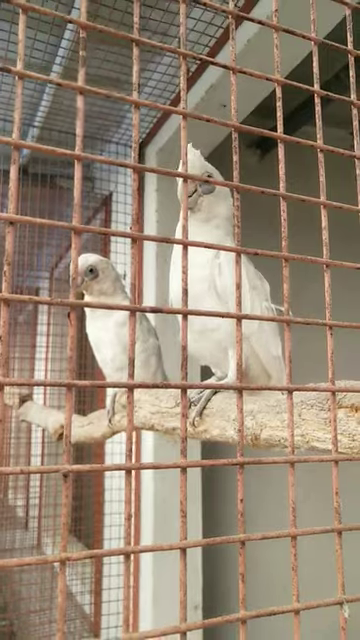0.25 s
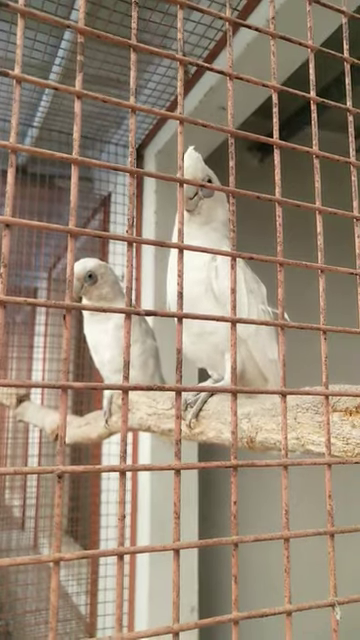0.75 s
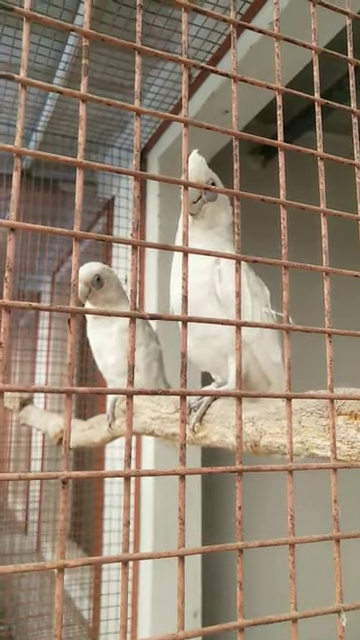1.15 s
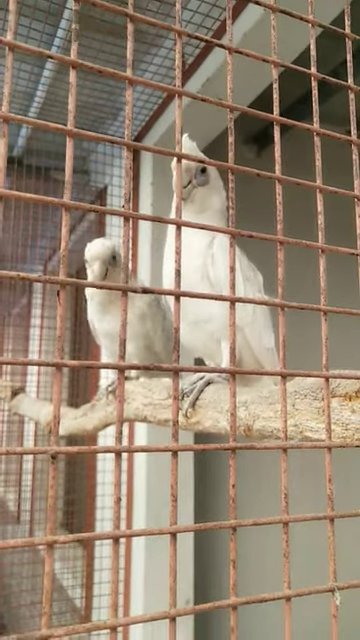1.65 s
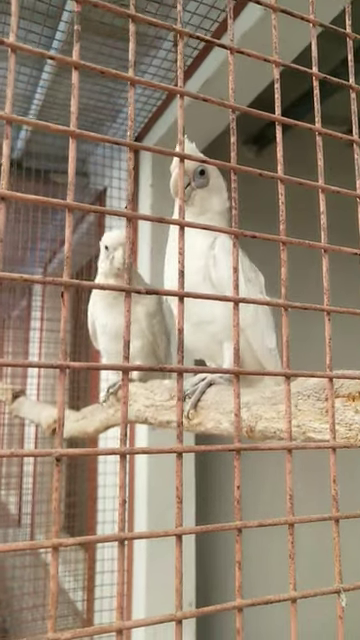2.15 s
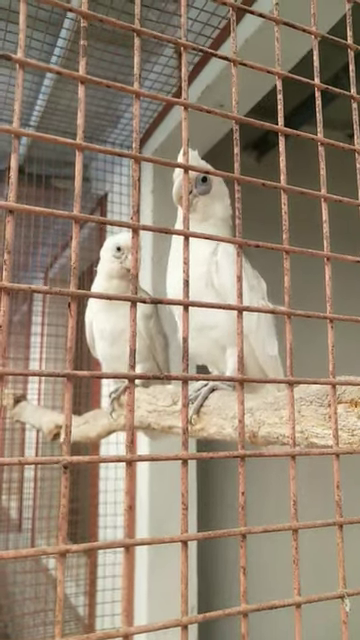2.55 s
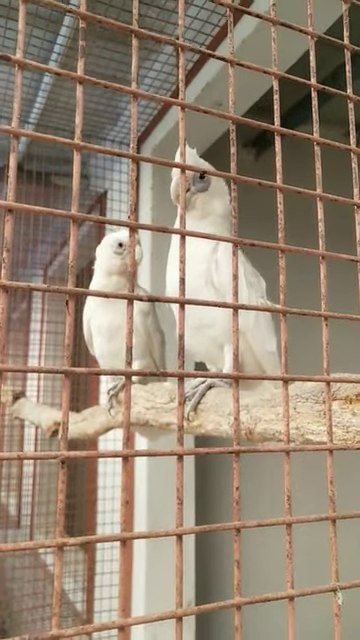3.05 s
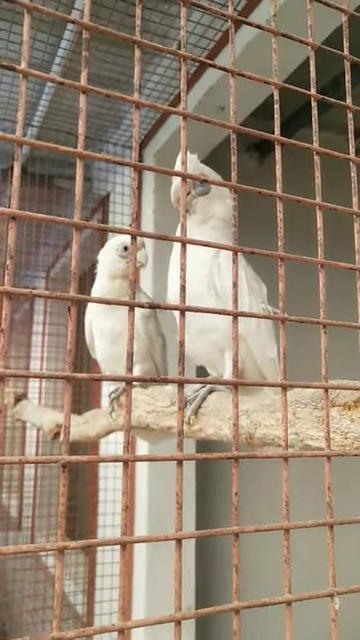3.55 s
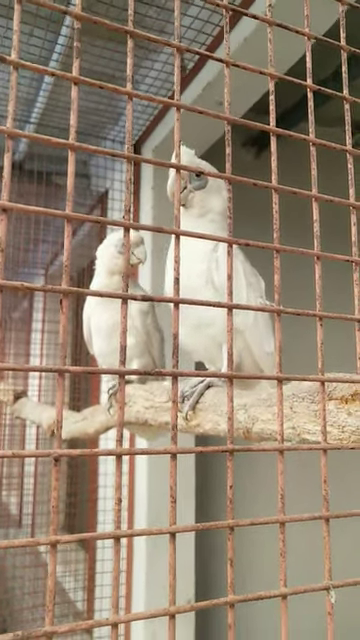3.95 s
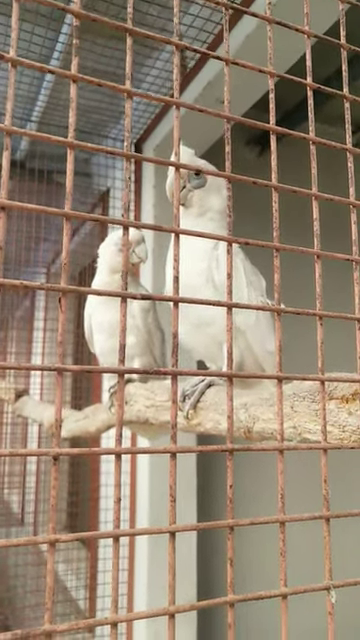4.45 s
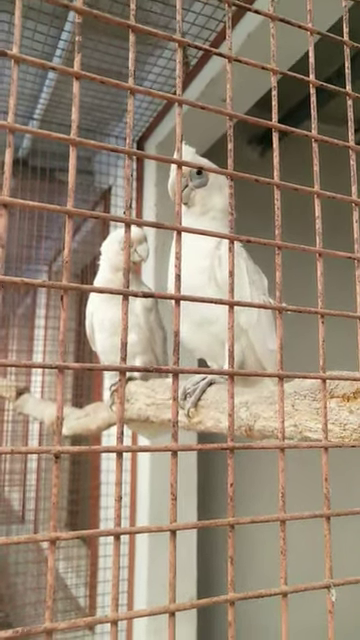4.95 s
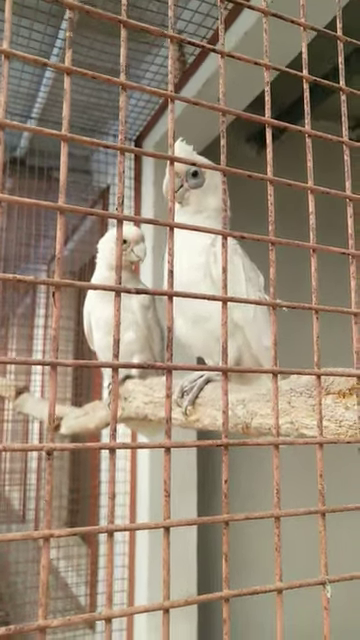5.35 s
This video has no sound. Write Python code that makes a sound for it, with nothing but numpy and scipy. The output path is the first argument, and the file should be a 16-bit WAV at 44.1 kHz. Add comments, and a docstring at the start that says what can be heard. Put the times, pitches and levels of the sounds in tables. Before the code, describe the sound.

In an echoing aviary, a cockatoo gives a string of short, nasal, trembling cries, about two or three a second, strongest near two seconds. Birds in other cages answer with rising squeals; later come low yelps, one hollow reply, then a clear level whistle between loud squeals. Far bangs and a shimmering distant flock lie behind. A small stereo microphone hears mostly reflections.

```python
"""An echoing aviary: a cockatoo begs with nasal, quavering cries and its partner replies once.
Birds in other cages answer with rising squeals, a clear whistle and low yelps, among thin high notes.
Each voice is a gliding stack of overtones, shaken in pitch and level, with rasping air on top.
Noise that dies away gives the echoes and far bangs; wavering tones blur into a far flock over a low
noise of open air. A small stereo microphone hears it all."""
import sys
import numpy as np
from scipy import signal
from scipy.fft import rfft, irfft, next_fast_len
from scipy.io import wavfile

SR = 44100
rng = np.random.default_rng(int(sys.argv[2]) if len(sys.argv) > 2 else 0)


def log_audio(samples):
    """Write samples as a 16-bit WAV file to the path given in sys.argv[1]."""
    # one column per channel
    frames = np.atleast_2d(samples).T
    # limit to full scale, then quantise
    limited = np.clip(frames, -1, 1)
    pcm = np.round(limited * 32767).astype(np.int16)
    wavfile.write(sys.argv[1], SR, pcm)


N = 246519
TIME = np.arange(N) / SR
PORT_GAP_M = 0.16  # between the two microphone ports


def from_db(db):
    """Decibels to gain."""
    return 10 ** (np.asarray(db) / 20)


def rms_one(x):
    """Scale to an rms of 1."""
    return x / np.sqrt(np.mean(x ** 2) + 1e-20)


def at_hz(points, hz):
    """Read a table on a log-frequency axis."""
    known_hz, values = np.transpose(points)
    return np.interp(np.log(np.maximum(hz, 1)), np.log(known_hz), values)


def bins(x):
    """Frequencies of the spectrum of x."""
    return np.fft.rfftfreq(x.shape[-1], 1 / SR)


def coloured(x, spectrum):
    """Give noise a spectrum; rms 1."""
    shaped = rfft(x) * from_db(at_hz(spectrum, bins(x)))
    return rms_one(irfft(shaped, x.shape[-1]))


def drift(rate_hz, size):
    """Smooth random wandering, spread 1: noise through two equal one-pole lowpasses."""
    r = np.exp(-2 * np.pi * rate_hz / SR)
    noise = rng.standard_normal(size + SR // 10)  # the extra tenth of a second settles the filter
    return rms_one(signal.lfilter([1], [1, -2 * r, r * r], noise)[-size:])


def tone_phase(hz):
    """Running phase of a tone whose pitch moves."""
    return 2 * np.pi * np.cumsum(hz) / SR


def diffuse(size):
    """Noise from all directions at two ports: alike in the bass, unrelated in the treble."""
    white = rng.standard_normal((2, next_fast_len(size)))
    mid, side = rfft(white)
    speed_of_sound = 343  # m/s
    alike = .94 * np.sinc(2 * bins(white) * PORT_GAP_M / speed_of_sound)
    mid, side = np.sqrt(1 + alike) * mid, np.sqrt(1 - alike) * side
    return rms_one(irfft([mid + side, mid - side], white.shape[-1])[:, :size])


# How long the building rings. Each row: frequency in Hz, time to fall by 60 dB in seconds.
REVERB = [(100, 3.8), (300, 2.6), (1000, 1.1), (2500, 1.56), (4500, 0.14), (8000, 1.29), (15000, 0.31)]


def dying_field(size):
    """Diffuse noise in which each octave dies at the pace of the building."""
    noise, t = diffuse(size), np.arange(size) / SR
    spectrum, centres, out = rfft(noise), np.geomspace(100, 12800, 8), 0
    for hz, share in zip(centres, np.eye(len(centres))):
        # each band peaks at its centre and crossfades into its neighbours
        band = irfft(spectrum * at_hz(np.c_[centres, share], bins(noise)), size)
        out = out + band * from_db(-60 * t / at_hz(REVERB, hz))
    return out


def aviary(x, direct_db, early_db, early_s, lag_ms=0):
    """Direct sound, a flurry of echoes from the nearest walls, and the long ring of the building."""
    t = TIME[:SR * 3 // 2]

    def unit(h):
        return rms_one(h) / np.sqrt(len(t))

    early = unit(diffuse(len(t)) * np.exp(-t / early_s) * (t > .003))
    late = unit(dying_field(len(t)) * (1 - np.exp(-t / 0.024)))
    response = late + from_db(early_db) * early
    # the direct sound reaches the left port lag_ms after the right
    response[[0, 1], [round(abs(lag_ms) * SR / 1000), 0]] += from_db(direct_db)
    return signal.fftconvolve(x[None], unit(response), axes=1)[:, :N]


# Colour of the open air. Each row: frequency in Hz, relative density in dB per Hz.
AIR = [(20, -21), (40, -14), (65, -1), (90, -1), (130, 3), (200, -2.5), (400, -4.5), (800, -3), (1400, -5),
       (3000, 0), (7000, -39), (11000, -32), (15500, -27.5)]


def outdoors(air_db=-48):
    """Steady low noise of the open air."""
    return from_db(air_db) * coloured(diffuse(N), AIR)


# Swell and ebb of the far flock. Each row: time in seconds, level in dB before flock_db is added.
FLOCK = [(0.0, -46), (0.42, -50.5), (0.89, -55), (1.51, -46), (1.67, -53.5), (2.71, -50.5), (3.24, -61.5),
         (3.81, -67), (4.13, -49), (4.47, -50), (5.14, -55.5), (5.31, -45), (5.59, -48)]
# Colour of the flock. Each row: frequency in Hz, relative density in dB per Hz.
FLOCK_COLOUR = [(1300, -5.5), (2200, 4), (3100, 6), (4200, 11), (5200, 2.5), (6800, 3), (8000, -5.5),
                (10000, -15.5), (15000, -51)]


def flock(count=16, spread=.05, quaver=.014, gate_db=7, hush_db=-3, flock_db=9.5):
    """Many far birds, each wavering in pitch and fading in and out, blur in echoes over a noise bed."""
    dry = 0
    for hz in np.geomspace(2700, 7400, count):
        pitch = hz * (1 + spread * drift(4, N) + quaver * drift(80.2, N))
        effort = from_db(gate_db * np.minimum(drift(3.3, N), 1))
        # sqrt(hz) because each bird fills a band as wide as its share of an octave
        weight = from_db(at_hz(FLOCK_COLOUR, hz)) * np.sqrt(hz)
        dry = dry + weight * effort * np.sin(tone_phase(pitch))
    din = rms_one(aviary(dry, direct_db=5, early_db=12.0, early_s=0.021))
    din = din + from_db(hush_db) * coloured(diffuse(N), FLOCK_COLOUR)
    return from_db(np.interp(TIME, *np.transpose(FLOCK)) + flock_db) * din


# Far bangs. Each row: start in seconds, level in dB, brightness in dB per octave.
BANGS = [(0.385, -34.5, -2), (1.012, -29.5, -1), (3.362, -32, -2), (4.095, -33.5, -2), (4.762, -31.5, -1)]
# Colour of a bang before its brightness tilt. Each row: frequency in Hz, relative density in dB per Hz.
BANG_COLOUR = [(40, -48), (100, -15), (150, -2), (200, -13), (260, -3.5), (380, -6), (700, 5), (1300, 4.5),
               (2200, 5), (4000, -6), (7000, -0.5), (10000, -18), (15000, -19.5)]


def bangs(build_s=0.015, boom_hz=153, boom_db=-11, boom_s=0.062):
    """Far blows arrive as a wash of reverberation; a low resonance of the building swells just behind."""
    out = np.zeros((2, N + 2 * SR))
    t = TIME[:2 * SR]
    for start, level_db, bright_db in BANGS:
        colour = [(hz, db + bright_db * np.log2(hz / 1000)) for hz, db in BANG_COLOUR]
        wash = coloured(dying_field(len(t)), colour)
        wash = wash / wash[:, :SR // 10].std()
        wash = wash * (1 - np.exp(-t / build_s)) * np.minimum(10 * (t[-1] - t), 1)
        boom_swell = (t / boom_s * np.exp(1 - t / boom_s)) ** 4  # peaks at boom_s
        boom_pitch = boom_hz * (1 + 0.051 * drift(6.0, len(t)))
        boom = boom_swell * np.sin(tone_phase(boom_pitch))
        at = round(start * SR)
        out[:, at:at + len(t)] += from_db(level_db) * (wash + from_db(boom_db) * boom)
    return out[:, :N]


# Air rasping through throat and beak. Each row: frequency in Hz, relative density in dB per Hz.
RASP = [(1200, -55), (2000, 8.5), (3000, -21), (4200, 9), (5200, -17), (6300, -1), (7600, 10), (9000, -6.5),
        (11500, -12), (15500, -26)]


def call(start, length, top_hz, level_db, rough, bright_db, tone, rise_s, scoop, sag,
         quaver, trill_hz, jitter, flutter_db, rasp_db, swell):
    """The syrinx glides to a set pitch and sags; roughness shakes pitch and level and lets air rasp."""
    size = int(length * SR)
    t, rise_s = TIME[:size], min(rise_s, length - .005)
    pace, depth, tremor, unrest = [drift(trill_hz, SR)[:size] for _ in range(4)]
    # before falls 1 to 0 during the rise; after climbs 0 to 1 during the sag
    before = np.clip(1 - t / rise_s, 0, 1)
    after = np.clip((t - rise_s) / (length - rise_s), 0, 1)
    glide = 1 - scoop * before ** 2 - sag * after ** 2
    # an uneven trill dips the pitch from a firm ceiling
    trill = np.sin(tone_phase(trill_hz * (1 + .35 * pace)))
    dip = (1 + trill) * from_db(2.955 * depth) - 1
    pitch = top_hz * glide * (1 + rough * (jitter * tremor - quaver * dip))
    phase = tone_phase(pitch)
    partials = []
    for multiple, db in tone:
        gain = from_db(db + bright_db * np.log2(multiple))
        if round(2 * multiple) % 2:
            gain = gain * rough  # the half multiples grow with roughness
        partials.append(gain * np.sin(multiple * phase))
    voice = rms_one(sum(partials))
    # air escapes in puffs, once a cycle
    air = coloured(rng.standard_normal(SR)[:size] * (1 + np.cos(phase)), RASP)
    sound = voice + from_db(rasp_db + bright_db) * rough * air
    pressure = np.abs(np.cos(np.pi / 2 * (before + after))) ** abs(swell)
    pressure = pressure * np.clip(glide, 0, 1) ** 1.94  # the voice is weaker below its top pitch
    flutter = rms_one(from_db(flutter_db * rough * unrest))
    # a second of margin at each end lets calls overlap the edges of the scene
    out, at = np.zeros(N + 2 * SR), SR + round(start * SR)
    out[at:at + size] = from_db(level_db) * pressure * flutter * sound
    return out[SR:SR + N]


# Overtones of thin notes and whistles. Each row: multiple of the pitch, level in dB before brightness.
PURE_TONE = [(1, -9), (2, -35)]


def thin_note(start, length, top_hz, level_db, rise_share=0.417):
    """A thin, slightly falling high note, almost free of overtones."""
    return call(start, length, top_hz, level_db, rough=.6, bright_db=4.5, tone=PURE_TONE,
                rise_s=rise_share * length, scoop=-0.0098, sag=0.0407, quaver=0.048, trill_hz=94.0,
                jitter=0.0187, flutter_db=12.0, rasp_db=-23.5, swell=0.46)


# Overtones of a yelp. Each row: multiple of the pitch, level in dB before brightness.
YELP_TONE = [(1, -13.5), (2, -0.5), (3, -15), (4, -3)]
# above this pitch yelps lose overtones: brightness in dB per octave falls by so much for each octave
YELP_FULL_HZ, YELP_DULLING_DB_PER_OCTAVE = 755, -46


def yelp(start, length, top_hz, level_db, scoop, rise_share=0.597):
    """A low, sliding note; the higher it is, the purer."""
    bright_db = YELP_DULLING_DB_PER_OCTAVE * np.log2(top_hz / YELP_FULL_HZ)
    return call(start, length, top_hz, level_db, rough=0.506, bright_db=bright_db, tone=YELP_TONE,
                rise_s=rise_share * length, scoop=scoop, sag=0.029, quaver=0.0867, trill_hz=55.03,
                jitter=0.0493, flutter_db=12.5, rasp_db=-37, swell=0.073)


# Overtones of a squeal. Each row: multiple of the pitch, level in dB before brightness and roughness.
SQUEAL_TONE = [(1, 4), (1.5, -37), (2, -11.5), (2.5, -42.5), (3, -30.5), (4, -39.5)]
# the second voice starts later and lower; its level in dB, relative to the first, is for full roughness
SECOND_LAG_S, SECOND_RATIO, SECOND_DB = .045, .865, -1


def squeal(start, length, top_hz, level_db, rough, bright_db):
    """A rising squeal in two voices, one from each side of the syrinx; roughness brings up the second."""
    second_db = level_db + SECOND_DB + 20 * np.log10(max(rough, .01))
    sides = [(start, length, top_hz, level_db),
             (start + SECOND_LAG_S, length - SECOND_LAG_S, top_hz * SECOND_RATIO, second_db)]
    return sum(call(*side, rough, bright_db, tone=SQUEAL_TONE, rise_s=.105, scoop=.31, sag=0.0398,
                    quaver=0.0712, trill_hz=69.44, jitter=0.01635, flutter_db=5, rasp_db=-16,
                    swell=0.15) for side in sides)


# Squeals; the one at 1.851 s is the half overtone (1.5 times the pitch) of the begging cry at 1.886 s.
# Each row: start in seconds, length in seconds, top pitch of the glide in Hz, level in dB,
# roughness from 0 to 1, brightness in dB per octave.
SQUEALS = [ (-0.13, 0.54, 3196, -43.5, 0.24, -13), (0.109, 0.15, 2618, -41, 0.14, -13),
           (0.249, 0.37, 3014, -30.5, 0.49, 2.5), (1.394, .24, 2960, -31.5, .3, 4),
           (1.851, 0.26, 3060, -36.5, .85, 0), (2.202, 0.24, 2876, -36.5, 0.86, -0.5),
           (3.379, 0.26, 3077, -33, 0.68, -33), (3.67, 0.3, 2900, -43, 0.84, 0),
           (4.169, 0.24, 2957, -31.5, .36, 4), (4.545, .29, 3184, -27.5, 0.56, -4.5),
           (5.13, .25, 3264, -28, 0.69, -0.5)]
# Thin high notes; those at 4.769 and 5.152 s are upper overtones of the squeals.
# Each row: start in seconds, length in seconds, pitch in Hz, level in dB.
THIN_NOTES = [ (0.261, 0.16, 6910, -43), (2.628, 0.25, 6580, -45), (2.838, .12, 6600, -39),
              (3.17, 0.049, 3520, -45), (3.701, 0.087, 3460, -43), (4.383, .055, 6600, -46),
              (4.538, 0.024, 5150, -40), (4.769, 0.096, 4403, -33), (5.152, 0.12, 4840, -36)]
# Each row: start in seconds, length in seconds, pitch reached in Hz, level in dB,
# scoop as a share of the pitch (positive slides up to it, negative slides down).
YELPS = [ (2.471, .105, 907, -36, .2), (3.924, .12, 1182, -39, 0.16), (4.057, 0.0776, 1230, -34, -0.24),
         (4.178, 0.183, 1007, -40, -.05), (5.461, 0.1, 1300, -49.5, -0.043)]


def neighbours():
    """Squeals, thin high notes and yelps, mostly from birds in other cages, heard mostly by their echoes."""
    high = sum(squeal(*row) for row in SQUEALS) + sum(thin_note(*row) for row in THIN_NOTES)
    low = sum(yelp(*row) for row in YELPS)
    high_echoed = aviary(high, direct_db=-4.5, early_db=3.5, early_s=0.019)
    return high_echoed + aviary(low, direct_db=0, early_db=16.5, early_s=0.023)


# Each row: start in seconds, length in seconds, pitch in Hz, level in dB.
WHISTLES = [(4.651, 0.21, 2362, -25), (4.925, 0.105, 2368, -32.5)]


def whistler(rise_share=0.653):
    """One bird holds a clear, nearly level note that swells and breaks off."""
    dry = sum(call(start, length, hz, level_db, rough=0.073, bright_db=-2, tone=PURE_TONE,
                   rise_s=rise_share * length, scoop=-0.0179, sag=.005, quaver=.05, trill_hz=44.4,
                   jitter=0.056, flutter_db=7, rasp_db=-24, swell=0.69)
              for start, length, hz, level_db in WHISTLES)
    return aviary(dry, direct_db=5.0, early_db=1.5, early_s=0.032)


# Begging cries. Each row: start in seconds, length in seconds, top pitch of the glide in Hz, level in dB,
# roughness from 0 to 1, brightness in dB per octave.
CRIES = [ (-0.02, 0.09, 1995, -40, 0.8, 5.5), (0.483, 0.193, 2034, -30, 0.75, -2.5),
         (0.796, 0.14, 1983, -31.5, 0.71, -2), (1.124, 0.2, 2014, -29.5, 0.7, 0),
         (1.429, .19, 2065, -27.5, 0.68, 0.5), (1.886, .21, 2094, -23, 0.76, 0),
         (2.329, .18, 2116, -27, 0.5, 1), (2.983, .26, 2030, -47.5, 0.89, 4.5)]
# Overtones of a cry. Each row: multiple of the pitch, level in dB before brightness and roughness;
# the halves come from alternate strong and weak cycles.
CRY_TONE = [(1, -8.5), (1.5, -9), (2, 1.5), (2.5, -15), (3, -3.5), (3.5, -23.5), (4, -21), (5, -29),
            (6, -45), (7, -36)]
# The reply. Each row: start in seconds, length in seconds, top pitch of the glide in Hz, level in dB,
# roughness from 0 to 1.
REPLY = [(3.905, .145, 2010, -29.4, .37)]
# Overtones of the reply. Each row: multiple of the pitch, level in dB before brightness and roughness.
REPLY_TONE = [(1, 2.5), (1.5, -13), (2, 2.5), (3, -1.5), (3.5, -1.5), (4, -8), (5, -17.5)]


def cockatoos():
    """The pair on the perch, heard almost wholly through echoes: one begs, one replies, hollower."""
    cries = sum(call(*row, tone=CRY_TONE, rise_s=0.0642, scoop=0.0352, sag=0.0184, quaver=0.0524,
                     trill_hz=116.26, jitter=0.01674, flutter_db=5.5, rasp_db=-7.5, swell=0.26)
                for row in CRIES)
    reply = sum(call(*row, bright_db=1.5, tone=REPLY_TONE, rise_s=.045, scoop=.137, sag=0.0456,
                     quaver=.046, trill_hz=102.2, jitter=0.02, flutter_db=6.5, rasp_db=-9.0, swell=0.21)
                for row in REPLY)
    return aviary(cries + reply, direct_db=-12.5, early_db=2.5, early_s=0.019, lag_ms=.36)


def scene(left_db=1.5):
    """All that reaches the microphone; the single birds are raised on the left and lowered on the right."""
    birds = (cockatoos() + neighbours() + whistler()) * from_db([[left_db], [-left_db]])
    return birds + bangs() + flock() + outdoors()


# Balance of the two ports. Each row: frequency in Hz, left minus right in dB.
LEFT_LEAD = [(60, 1), (92, -0.5), (140, 1.5), (210, 0.5), (330, 2.5), (500, 0), (770, 3), (1170, 2.5),
             (1790, 6.5), (2740, 4), (4190, 1.5), (6410, 7), (9810, 6.5), (15000, -1.5)]
CUTOFF_HZ = 15600


def record(dry):
    """The left port hears more treble than the right; a steep lowpass cuts the top."""
    padded = np.pad(dry, ((0, 0), (0, next_fast_len(N + SR // 10) - N)))
    ports = from_db(at_hz(LEFT_LEAD, bins(padded)) * np.array([[.5], [-.5]]))
    heard = irfft(rfft(padded) * ports, padded.shape[-1])[:, :N]
    lowpass = signal.ellip(12, .1, 80, CUTOFF_HZ, fs=SR, output="sos")
    return signal.sosfilt(lowpass, heard)


dry = scene()
out = record(dry)
log_audio(out)
```